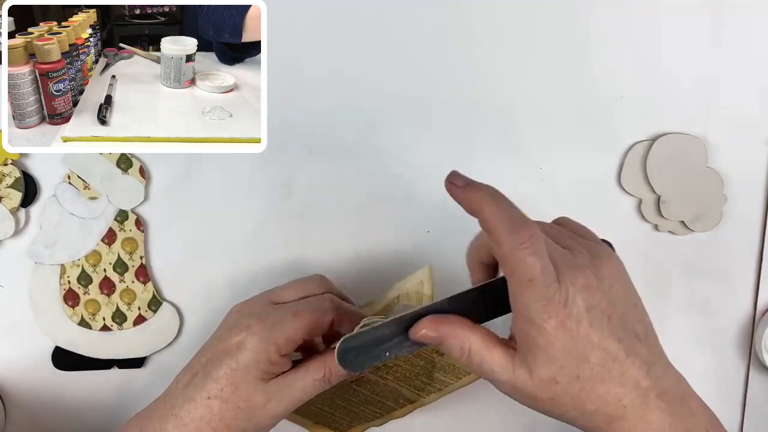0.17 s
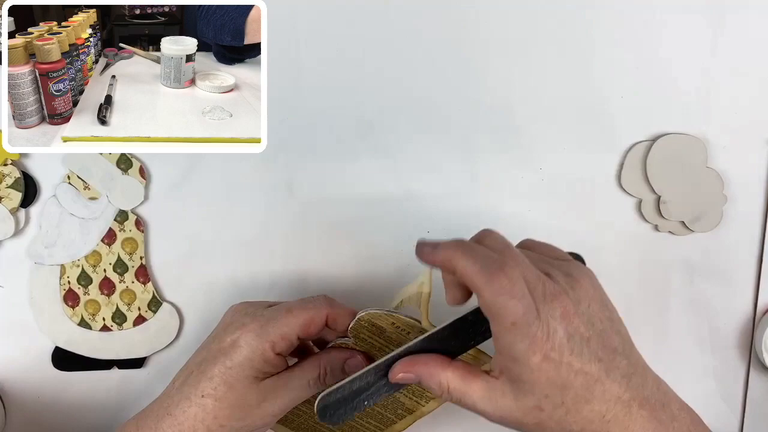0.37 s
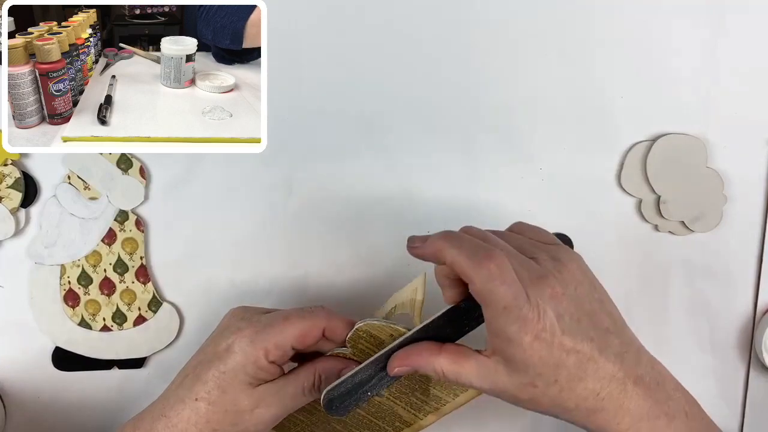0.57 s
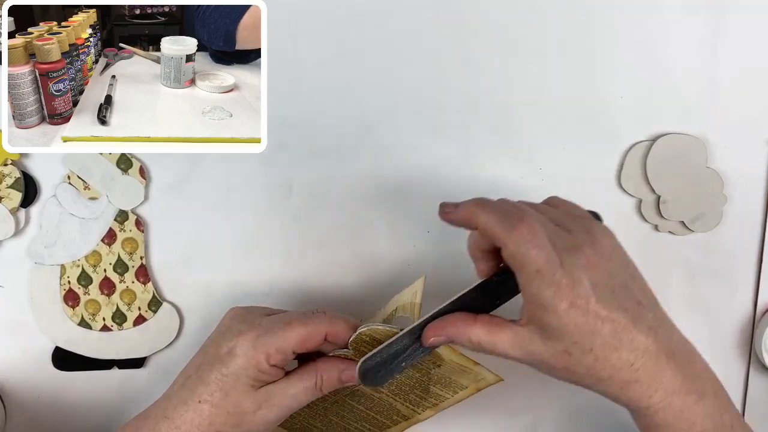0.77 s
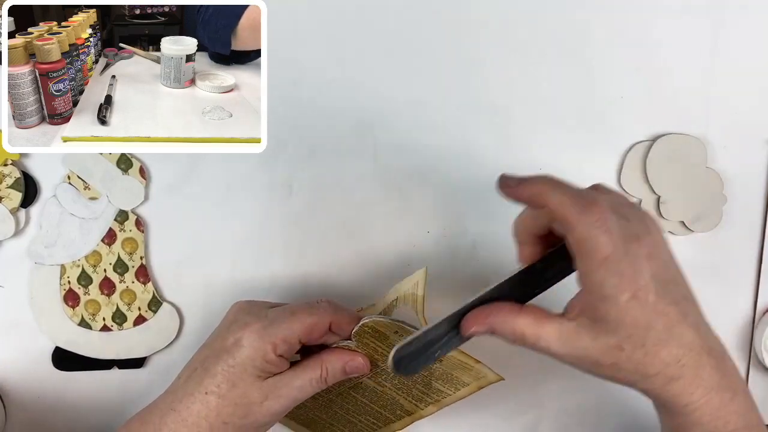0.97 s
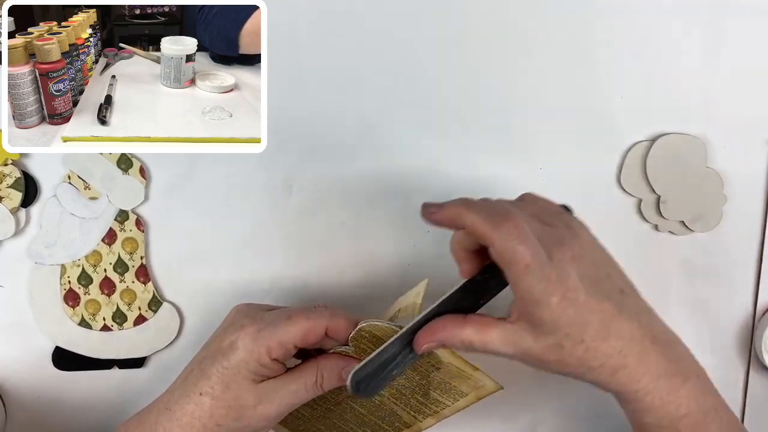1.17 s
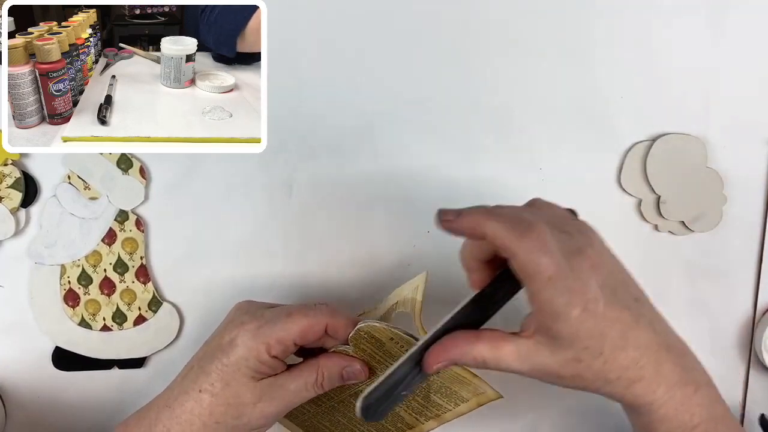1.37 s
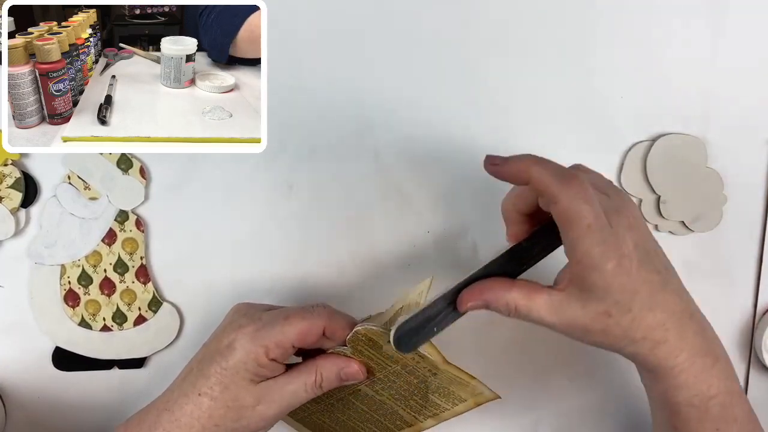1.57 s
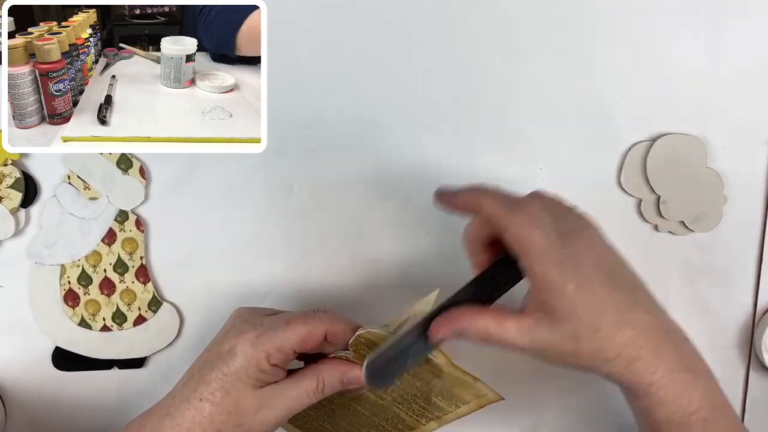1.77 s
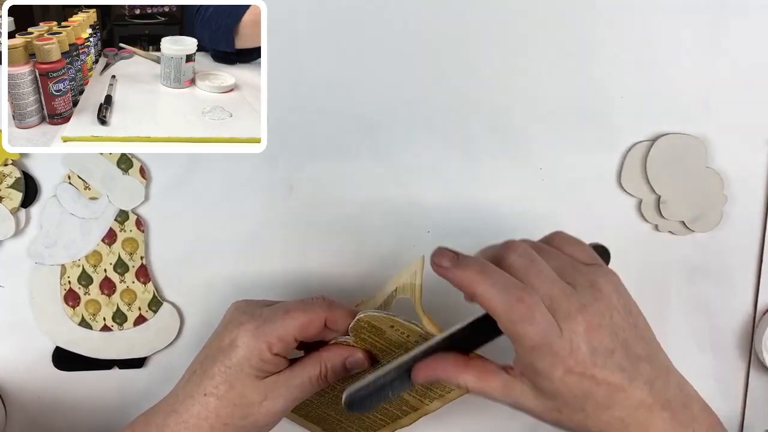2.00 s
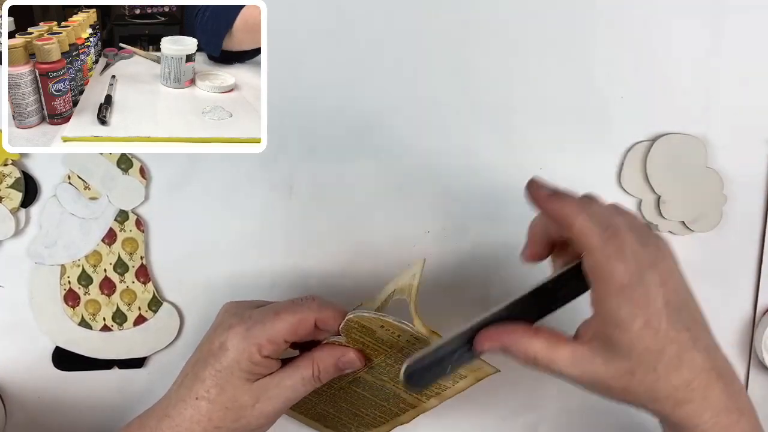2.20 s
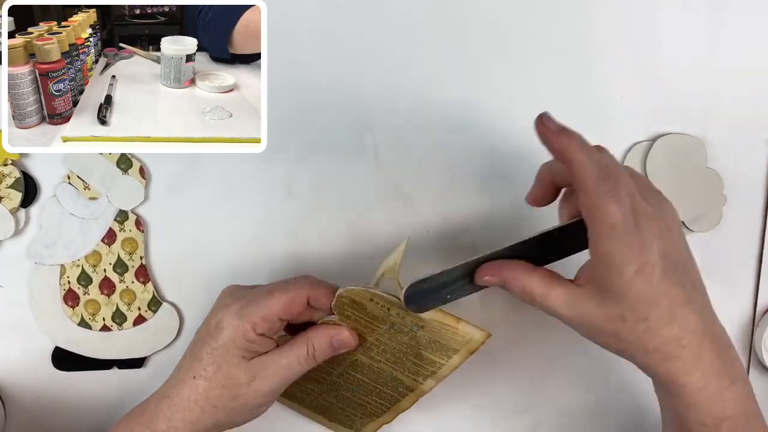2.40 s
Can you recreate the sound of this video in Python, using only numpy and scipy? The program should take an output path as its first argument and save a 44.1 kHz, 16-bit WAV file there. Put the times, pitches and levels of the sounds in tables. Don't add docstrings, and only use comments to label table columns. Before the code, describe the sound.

Sanding with an emery board on a small papered wooden ornament. Very faint scuffs until 0.45 s, light knocks around 0.7 s, then short gritty rasps at about 0.83-1.03, 1.28-1.4, 1.59-1.7, 1.87-1.96 and 2.18-2.3 s. Tiny paper snaps follow 1.97 s; sharper taps sound at 2.17 and 2.43 s. Close and dry, with quiet room hiss, low hand rumble and a thin, rapid electrical tick.

```python
import sys
import numpy as np
from scipy import signal
from scipy.io import wavfile
from scipy.ndimage import uniform_filter1d

SR = 44100
rng = np.random.default_rng(int(sys.argv[2]) if len(sys.argv) > 2 else 0)


def master_out(mix):
    frames = np.transpose(np.atleast_2d(mix))
    ceiling = np.clip(frames, -1, 1)
    pcm = np.round(ceiling * 32767).astype(np.int16)
    wavfile.write(sys.argv[1], SR, pcm)


def linear_from_db(decibels):
    return 10 ** (np.asarray(decibels, float) / 20)


N = 108000

# t/s, level/dB, speed brightness/dB
STROKES = [
    [(.828, -54, -10), (.85, -42, -15), (.885, -37, -11.5), (.906, -38, -16), (.92, -43, -12),
     (.96, -42, -15), (1.021, -39.5, -18), (1.04, -77, 2)],
    [(1.268, -64, -10), (1.293, -40.5, -16), (1.325, -34, -10), (1.36, -31.5, -12.5), (1.383, -36.5, -12),
     (1.395, -44, -15), (1.435, -73, -2)],
    [(1.584, -70, -12), (1.589, -41, -9.5), (1.598, -38, -17), (1.63, -33.5, -15), (1.66, -33.5, -12.5),
     (1.692, -39.5, -13), (1.714, -69, -10), (1.74, -76, 4)],
]
LATE_STROKES = [
    [(1.868, -71, -13), (1.874, -40.5, -15), (1.887, -35.5, -9), (1.925, -35, -8), (1.944, -34.5, -3),
     (1.959, -39, -9), (1.964, -60.5, 5), (1.99, -54, -10)],
    [(2.18, -53.5, -18), (2.192, -48.5, -10), (2.212, -36, -11.5), (2.256, -33.5, -12), (2.28, -32, -16),
     (2.293, -40.5, -19), (2.308, -55, -13), (2.34, -61.5, -24), (2.4, -70, -26)],
]
# t/s, level/dB, speed brightness/dB
LAST_TOUCH = [
    (2.42, -75, -7),
    (2.423, -38.5, -8.5),
    (2.433, -63, -26),
    (2.439, -55.5, 3),
    (2.449, -55, -13),
]
# pitch factor, damping factor, lowest modes/dB, finest hiss/dB
STROKE_PLACE = [(1.002, 1.95, 0.5, -0.5), (1.012, 1.37, -3.5, -4.5), (1.006, 0.77, -2, -3.5),
                (1.003, 0.74, -2.5, -3), (1.194, 1.6, 4.5, -7), (1.03, 1.2, -0.5, .1)]
EDGE_SONG_DB = [-22.5, -19, -19.5, -20, -33, -26]
# f/Hz, width/Hz, level/dB
WOOD = [(312, 226, -16.5), (508, 95.5, -4), (613, 103, -0.5), (716, 89.5, 2.5), (887, 106, -5.5),
        (1195, 280, -15), (1317, 97, -11), (1439, 102, -9.5), (1816, 82, -13), (2160, 150, -15.5),
        (2600, 320, -13.5), (3040, 1070, -24), (3795, 830, -18), (4800, 93, -28.5)]
# f/Hz, width/Hz, level/dB
HISS = [(1800, 740, 0), (3700, 3060, 1), (5400, 400, -24), (5680, 730, -13), (7110, 590, 1),
        (7970, 600, -5), (8650, 660, -2.5), (10450, 660, -7.5), (11800, 760, -8.5), (13100, 1200, -16),
        (15000, 1200, -17)]
# t/s, peak level/dB, f/Hz, brightness/dB, snap f/Hz
TAPS = [(0.398, -50, 640, -17, 2550), (0.418, -56, 745, -11, 2190), (0.662, -26.5, 735, -9, 1940),
        (.665, -37, 830, -13, 1980), (0.711, -34, 710, -5, 2050), (.7297, -42, 745, -14, 2100),
        (0.7325, -30.5, 780, -11, 2160), (0.7477, -32, 730, -3, 1980), (.7487, -39.5, 745, -9, 2100),
        (.8037, -46, 660, -10, 2500), (0.818, -27, 830, -12, 2600), (0.832, -35, 700, -10, 3030),
        (0.8379, -27, 830, -6, 2700), (.8795, -26.5, 810, -12, 2500), (.9025, -26.5, 760, -12, 2500),
        (.9705, -29.5, 744, -10, 2400), (.9824, -29, 795, -12, 2500), (1.005, -29.5, 740, 4, 2630),
        (1.216, -55, 610, -16, 1980), (1.2452, -29.5, 736, -11, 2830), (1.2837, -31.5, 700, -15, 2000),
        (1.5543, -31, 700, -12.5, 3070), (1.838, -38.5, 721, 2, 1800), (1.873, -29.5, 710, -13, 2190),
        (2.1655, -39, 744, -20, 2000), (2.1685, -19, 820, -4.5, 2960), (2.1712, -32.5, 910, -12, 2000),
        (2.1806, -46, 650, -25, 2030), (2.1915, -34.5, 495, -27, 2000), (2.287, -29.5, 730, -26, 1920),
        (2.427, -26.5, 850, 3, 1510), (2.4392, -19, 844, -4.5, 2600), (2.4418, -32, 750, -15, 2100)]
# t/s, peak level/dB, f/Hz
PAPER_SNAPS = [
    (1.9692, -30, 2240),
    (1.9895, -46, 1100),
    (2.0015, -42, 1740),
    (2.021, -44, 1890),
    (2.0455, -52, 1900),
    (2.0645, -57, 1880),
    (2.0835, -54, 900),
    (2.125, -56, 1890),
]
# centre t/s, half length/s, level/dB
SHUFFLE = [
    (.002, 0.029, -52.5),
    (0.047, 0.0074, -61.5),
    (0.087, 0.015, -66.5),
    (0.132, 0.024, -59),
    (0.188, 0.021, -49.5),
    (0.243, 0.024, -58),
    (0.326, 0.028, -59.5),
    (0.413, 0.032, -69.5),
]
# f/Hz, width/Hz, level/dB
SCUFF = [(721, 186, -0.5), (1600, 175, -5), (2100, 250, -6), (2970, 200, 2.5), (4150, 160, -12),
         (4450, 200, -6.5), (5100, 220, -12)]
# centre t/s, half length/s, level/dB, centre f/Hz
BRUSHES = [(0.133, .015, -70, 4700), (0.196, 0.0093, -65, 4500), (0.328, 0.012, -64.5, 4470),
           (0.481, .012, -68, 5960), (0.484, 0.054, -69.5, 6550), (0.488, 0.04, -66, 2600),
           (0.674, 0.04, -64.5, 880), (0.713, 0.0026, -63, 4260), (.734, 0.0027, -61, 4170),
           (.7342, 0.0038, -64, 8250), (0.738, 0.16, -71.5, 2310), (0.7496, 0.0022, -64, 8600),
           (.7505, 0.0014, -61, 4380), (.77, 0.042, -73, 4420), (0.807, 0.0023, -66, 4300),
           (.82, .0025, -61.5, 9000), (0.837, 0.0018, -58, 4100), (1.009, 0.0096, -51.5, 2530),
           (1.221, 0.0044, -73, 3700), (1.222, 0.0072, -59, 383), (1.836, 0.018, -69, 2900),
           (1.987, 0.058, -68, 1800), (2.002, .005, -60, 250), (2.044, 0.19, -62, 593),
           (2.156, 0.1, -66.5, 1570), (2.311, 0.078, -62.5, 1800)]
# f/Hz, width/Hz, level/dB
TABLE = [(305, 24, -20), (700, 6.1, -8), (1256, 28, 5), (1360, 5.3, -2.5), (1670, 8.3, -24), (2000, 44, 3)]
# f/Hz, T60/s
ROOM_T60 = [(300, 0.27), (1000, 0.15), (4000, 0.18), (12000, 0.082)]
# t/s, level/dB
RUMBLE = [(0.0, -69), (0.07, -60.5), (0.64, -75.5), (0.68, -56), (0.94, -73), (1.08, -64), (1.11, -75),
          (1.42, -61.5), (1.52, -68), (1.57, -56), (1.81, -73), (1.88, -52.5), (1.93, -77), (1.98, -55),
          (2.13, -69), (2.18, -51.5), (2.25, -63), (2.45, -59)]
# f/Hz, level/dB per Hz
AIR = [(35, -11), (60, -1), (560, -17), (1050, -20), (3770, -26.5), (5220, -26.5), (11000, -31),
       (14400, -34), (15600, -40)]
# t/s, height
TICK_EDGES = [
    (0, 1),
    (.000284, -.85),
    (.000436, -.42),
]


def evened(x):
    return x / np.sqrt(np.mean(x ** 2) + 1e-20)


def read(points, hz):
    f, value = np.transpose(points)
    return np.interp(np.log(hz + 1), np.log(f + 1), value)


def along(rows, column=1, outside=-120):
    rows = np.array(rows)
    return np.interp(np.arange(N) / SR, rows[:, 0], rows[:, column], outside, outside)


def swell(s, half_s, db):
    return linear_from_db(db) * np.exp(-((np.arange(N) / SR - s) / half_s) ** 2)


def ring(x, hz, width_hz):
    return signal.lfilter(*signal.iirpeak(hz, hz / width_hz, SR), x)


def body(x, modes, pitch=0.93, damping=0.98):
    return sum((-1) ** k * linear_from_db(db) * ring(x, hz * pitch, w * damping) for k, (hz, w, db) in enumerate(modes))


def grit(per_s, spread_db):
    chatter_db, chatter_s = 0.8, 0.003
    chance, size = rng.random(N), rng.exponential(1, N)
    clump, sign = rng.standard_normal(N), rng.standard_normal(N)
    width = round(chatter_s * SR)
    clump = evened(uniform_filter1d(uniform_filter1d(clump, width), width))
    strength = linear_from_db(spread_db * np.minimum(size, 4) + chatter_db * clump)
    return evened((chance < per_s / SR) * sign * strength)


def strokes():
    edge_hz, edge_width_hz, hiss_db = 4630, 450, -11
    fine_share = 0.49
    notch_hz, notch_q, notch_share = 6120, 7, 0.33
    coarse, dust, out = grit(8000, 2), grit(16000, 0.31), np.zeros(N)
    drive = evened(0.49 * coarse + 1.4 * dust)
    edge = evened(ring(drive[::-1], edge_hz, edge_width_hz))
    every_stroke = STROKES + LATE_STROKES + [LAST_TOUCH]
    for rows, place, edge_db in zip(every_stroke, STROKE_PLACE, EDGE_SONG_DB):
        pitch, damping, low_db, fine_db = place
        level_db = along(rows)
        push = linear_from_db(level_db)
        bright = linear_from_db(along(rows, column=2, outside=0) + 10.5) * drive
        fine_gate = np.clip((level_db + 58.5) / 14, 0, 1)
        fine = linear_from_db(fine_share * (level_db + 36) - 36) * fine_gate * bright

        wood = body(push * coarse, WOOD[2:6], pitch, damping)
        wood += linear_from_db(low_db) * body(push * coarse, WOOD[:2], pitch)
        wood += body(push * bright, WOOD[6:], pitch)
        out += wood / np.std(body(coarse, WOOD[2:6], pitch, damping))

        hiss = body(push * bright, HISS[:3], 0.89, 0.81)
        hiss -= body(fine, HISS[3:7], np.sqrt(pitch), 0.89)
        hiss -= linear_from_db(fine_db) * body(fine, HISS[7:], 0.98, 1)
        out += linear_from_db(hiss_db) * hiss / np.std(body(drive, HISS))

        edge_push = linear_from_db(1.24 * (level_db + 36.5) - 36.5) * (push > 1e-5)
        out += linear_from_db(edge_db) * ring(edge_push * edge, edge_hz, edge_width_hz * 2)
    return out - notch_share * ring(out, notch_hz, notch_hz / notch_q)


def prick(t):
    return -t * np.exp(-t / 0.00004)


def taps():
    blow_s, lag_s, low_hz, upper_hz = 0.0003, 0.001475, 378, 1103
    low_db, ring_db, snap_db, upper_db = -10.5, -26.5, -9.5, -12
    out, t = np.zeros(N + 4000), np.arange(4000) / SR
    blow = -t ** 2 * np.exp(-t / blow_s)
    low = ring(blow, low_hz, 216)
    upper = ring(ring(blow, upper_hz, 430), upper_hz, 590)
    noises = rng.standard_normal((len(TAPS), 4000))
    for (s, db, hz, bright_db, snap_hz), noise in zip(TAPS, noises):
        width_hz = 400 * linear_from_db(0.24 * (db + 26.5))
        knock = ring(ring(blow, hz, width_hz), hz, 2 * width_hz)
        wood = body(blow, WOOD[:6], hz / 730)
        crackle = prick(t) + 6e-6 * noise * np.exp(-t / 0.0037)
        snap = ring(ring(crackle, snap_hz, 1360), snap_hz, 1360)
        layers = [(0, knock), (low_db, low), (ring_db, wood), (bright_db + snap_db, snap), (upper_db, upper)]
        tap = sum(linear_from_db(layer_db) * x / abs(x).max() for layer_db, x in layers)
        out[round((s + lag_s) * SR):][:4000] += linear_from_db(db - 2.5) * tap
    return out[:N]


def paper_snaps():
    thud_db, thud_s = -7, 0.00024
    out, t = np.zeros(N + 4000), np.arange(4000) / SR
    thud = np.e * t / thud_s * np.exp(-t / thud_s)
    for s, db, hz in PAPER_SNAPS:
        snap = ring(ring(prick(t), hz, 660), hz, 1200)
        out[round(s * SR):][:4000] += linear_from_db(db) * (snap / abs(snap).max() - linear_from_db(thud_db) * thud)
    return out[:N]


def shuffle(rub):
    air_db, air_hz = -9, 3800
    slide = evened(body(rub, SCUFF)) + linear_from_db(air_db) * evened(ring(rub, air_hz, 3600))
    return sum(swell(*row) for row in SHUFFLE) * slide


def brushes(rub):
    q, flick_s = 1.57, 0.012
    out = np.zeros(N)
    for s, half_s, db, hz in BRUSHES:
        tone = ring(ring(rub, hz, hz / q), hz, hz / (q + flick_s / half_s))
        out += swell(s, half_s, db) * evened(tone)
    return out


def table_top(rubbed, tapped):
    return body(rubbed + linear_from_db(-13) * tapped, TABLE, 0.96, 0.87)


def room(x):
    echo = np.zeros(SR // 2)
    at = np.arange(100, SR // 2 - 20, 20)
    echo[at + rng.integers(0, 20, len(at))] = rng.choice([-1., 1.], len(at))
    hz, t, z = signal.stft(echo, SR, nperseg=256)
    decay = linear_from_db(-60 * t / read(ROOM_T60, hz)[:, None])
    tail = signal.istft(z * decay, SR, nperseg=256)[1]
    return signal.fftconvolve(x, tail / np.linalg.norm(tail))[:N]


def rumble():
    hz = 34.2
    low = ring(ring(rng.standard_normal(N), hz, 45), hz, 63)
    return linear_from_db(along(RUMBLE, outside=-70)) * evened(low)


def air():
    level_db, patch_db = -69, 0.23
    frames, hz = N // 256 + 5, np.fft.rfftfreq(1024, 1 / SR)
    a, b, patches = rng.standard_normal((frames, 513, 3)).T
    patches = evened(uniform_filter1d(uniform_filter1d(patches, 12, 0), 8, 1))
    spectrum = (a + 1j * b) * linear_from_db(read(AIR, hz)[:, None] + patch_db * patches)
    floor = signal.istft(spectrum, nperseg=1024, noverlap=768)[1][:N]
    return linear_from_db(level_db) * evened(floor)


def tick():
    start_s, period_s, width_s, level_db = 0.002405, 0.0166854, 0.000016, -50
    phase = (np.arange(N) / SR - start_s + period_s / 2) % period_s - period_s / 2
    return linear_from_db(level_db) * sum(h * np.exp(-0.5 * ((phase - s) / width_s) ** 2) for s, h in TICK_EDGES)


def scene():
    mic_low_hz, room_db = 126, -16
    rubbed = strokes()
    tapped = taps() + paper_snaps()
    rub = grit(6000, 1.6)
    close = rubbed + tapped + shuffle(rub) + brushes(rub)
    near = signal.lfilter(*signal.butter(2, mic_low_hz, "high", fs=SR), close)
    background = rumble() + air() + tick()
    return (near + linear_from_db(room_db) * room(near) + table_top(rubbed, tapped) + background)[None]


def roll_off(x):
    return signal.sosfilt(signal.butter(12, 15720, fs=SR, output="sos"), x)


def record(dry):
    edge = signal.firwin(401, 15750, window=("kaiser", 9), fs=SR)
    mix = signal.oaconvolve(dry, edge[None], "same")
    return roll_off(mix)


dry = scene()
out = record(dry)
master_out(out)
```